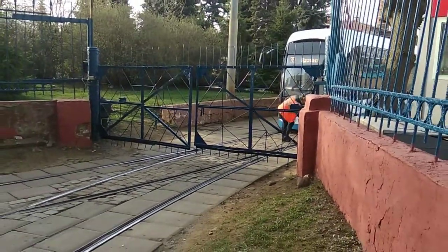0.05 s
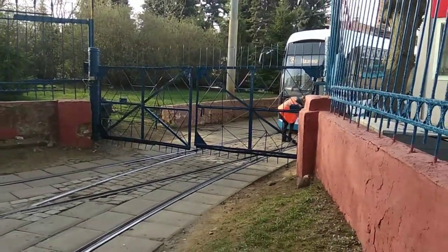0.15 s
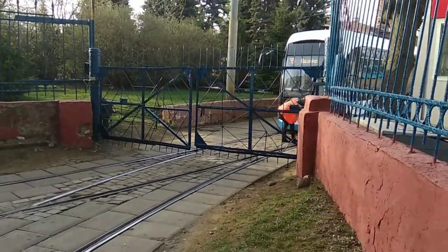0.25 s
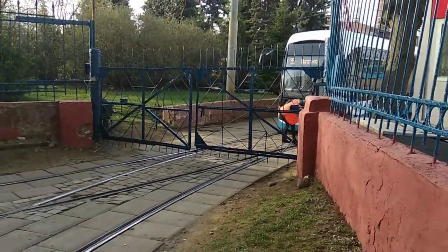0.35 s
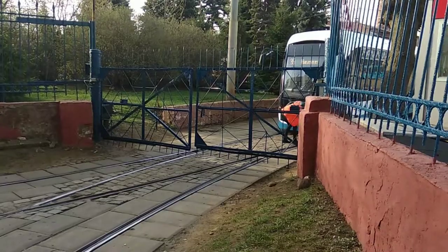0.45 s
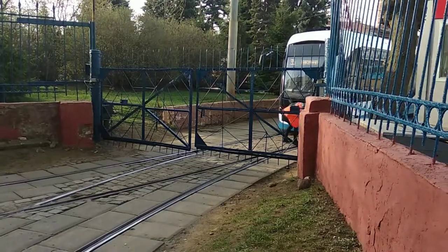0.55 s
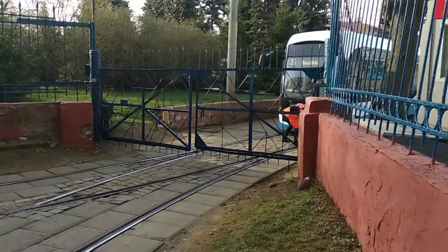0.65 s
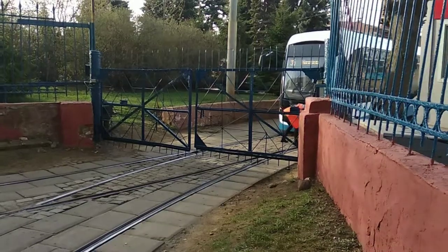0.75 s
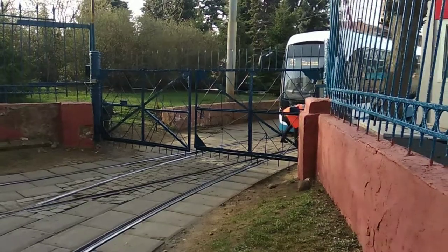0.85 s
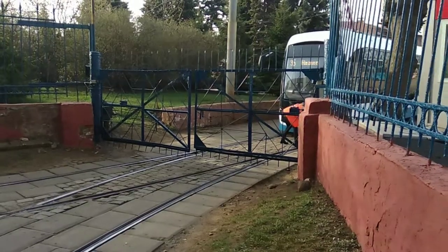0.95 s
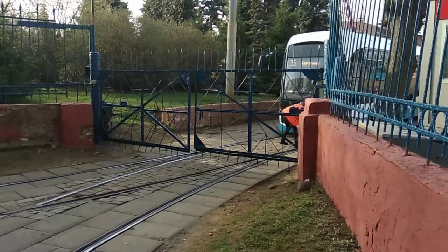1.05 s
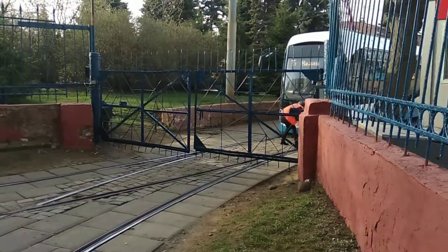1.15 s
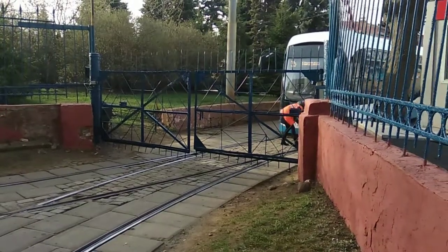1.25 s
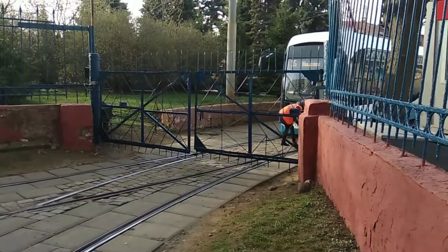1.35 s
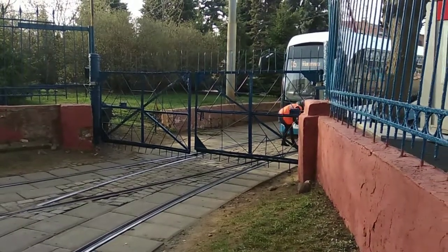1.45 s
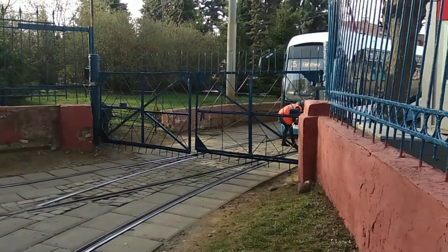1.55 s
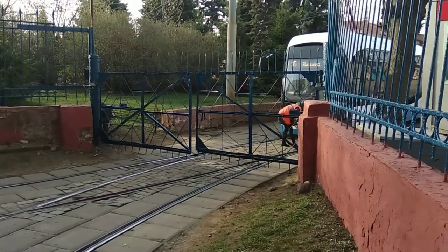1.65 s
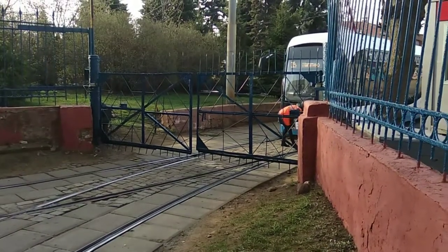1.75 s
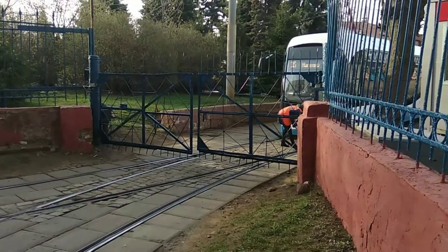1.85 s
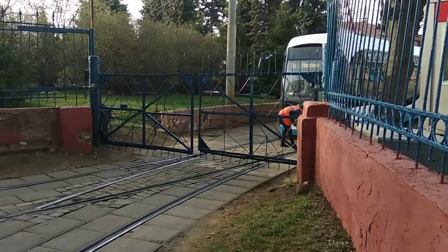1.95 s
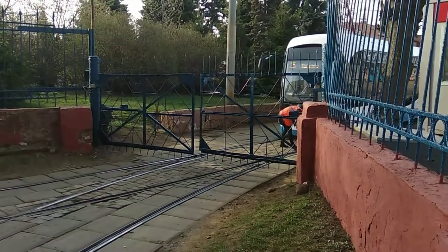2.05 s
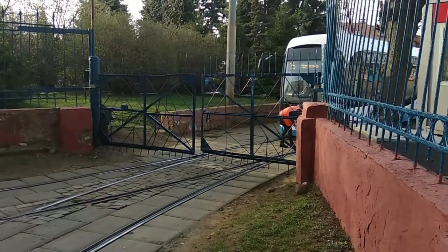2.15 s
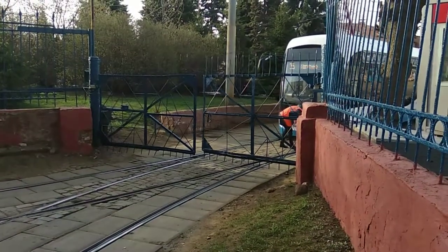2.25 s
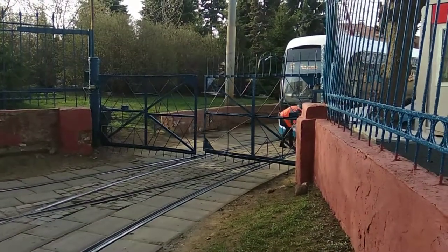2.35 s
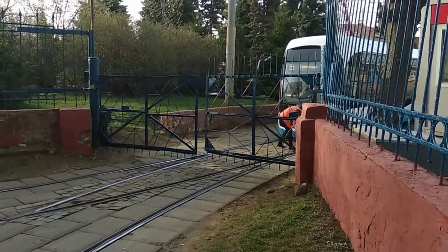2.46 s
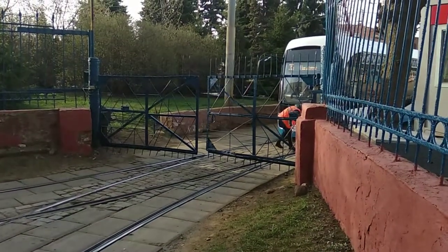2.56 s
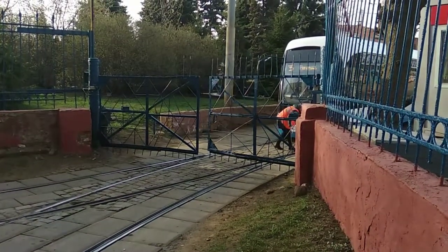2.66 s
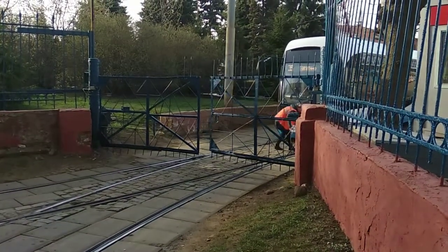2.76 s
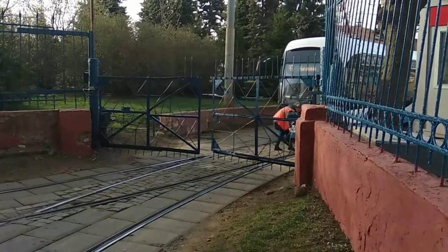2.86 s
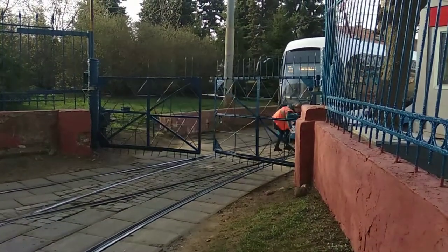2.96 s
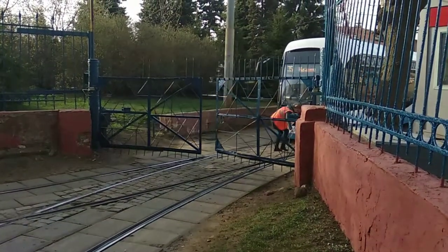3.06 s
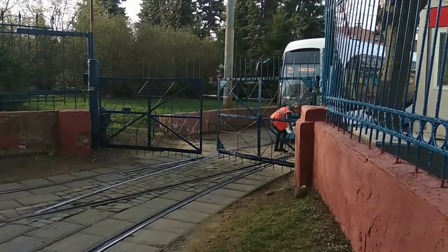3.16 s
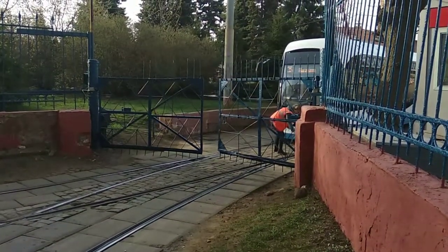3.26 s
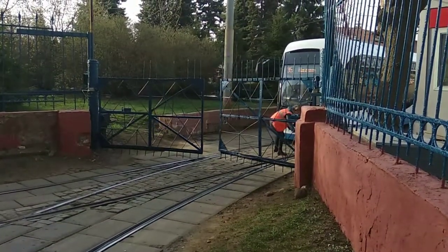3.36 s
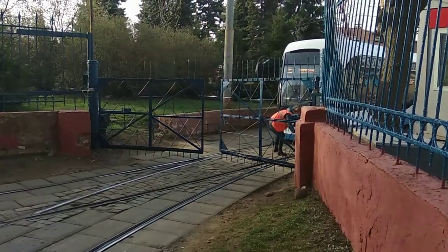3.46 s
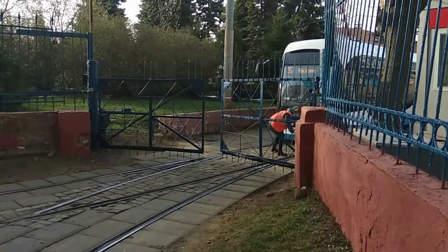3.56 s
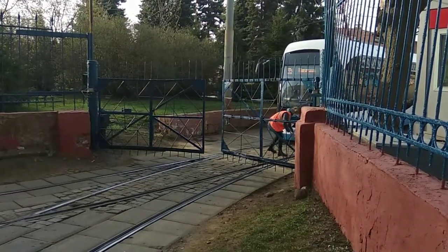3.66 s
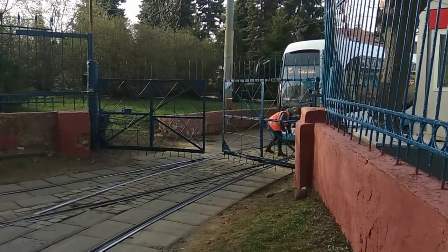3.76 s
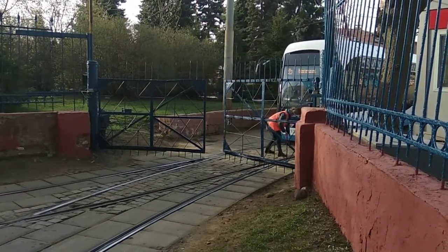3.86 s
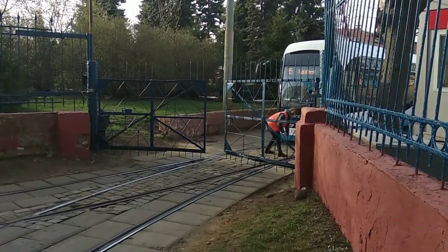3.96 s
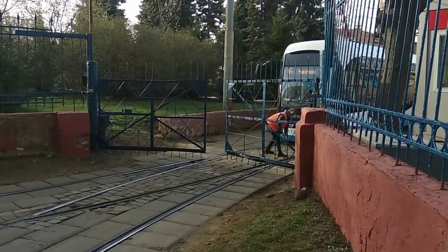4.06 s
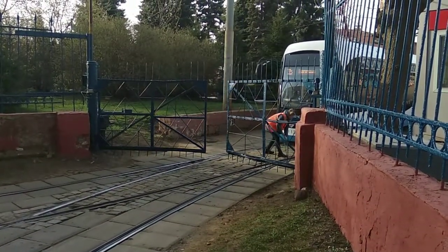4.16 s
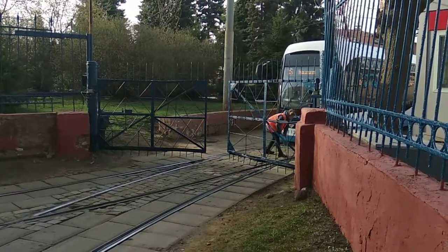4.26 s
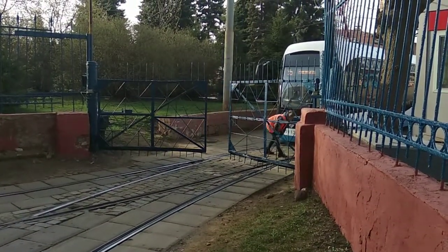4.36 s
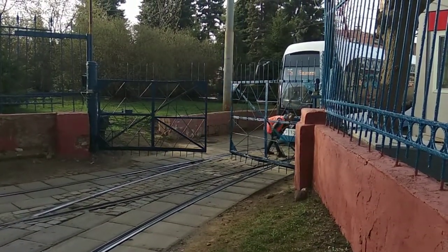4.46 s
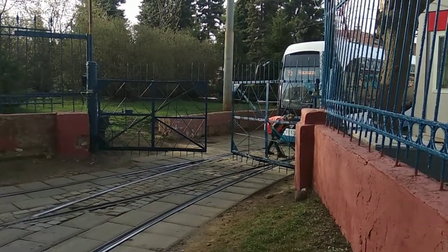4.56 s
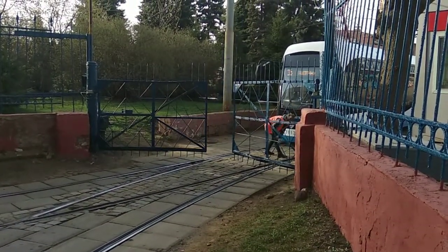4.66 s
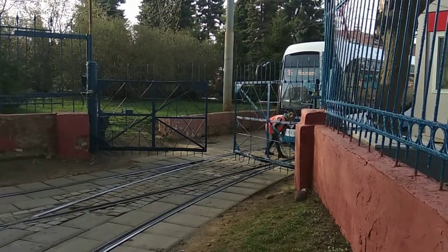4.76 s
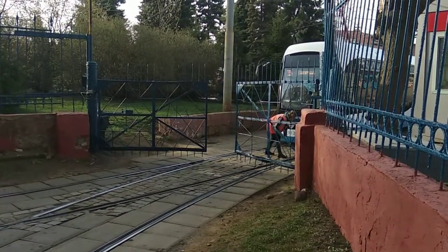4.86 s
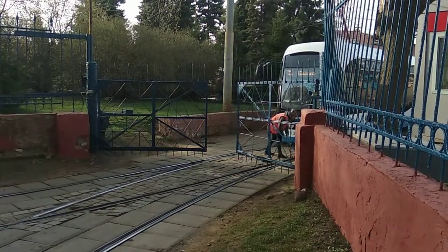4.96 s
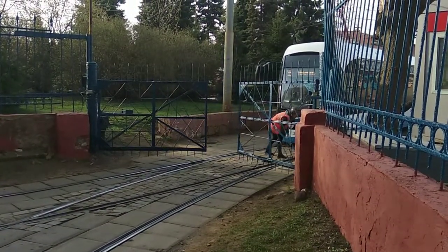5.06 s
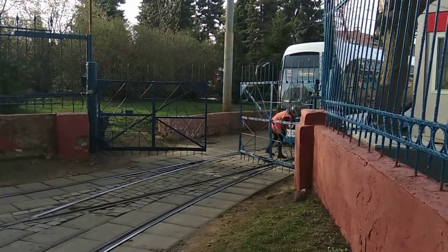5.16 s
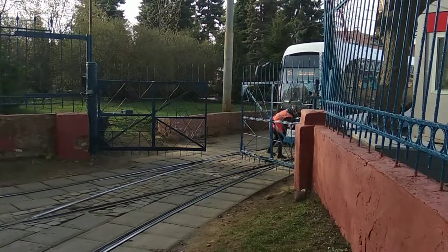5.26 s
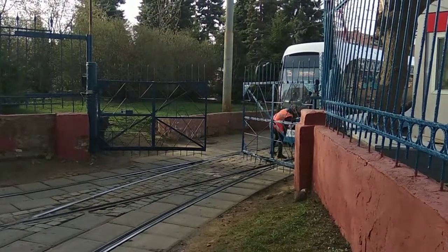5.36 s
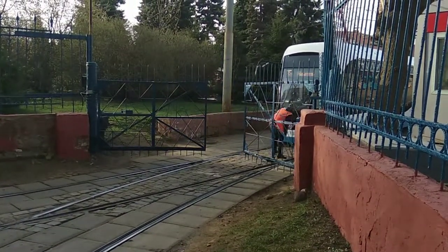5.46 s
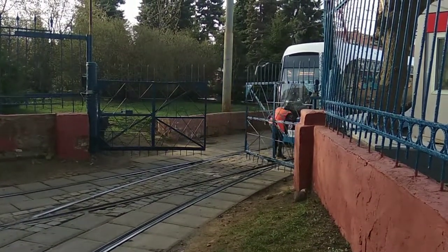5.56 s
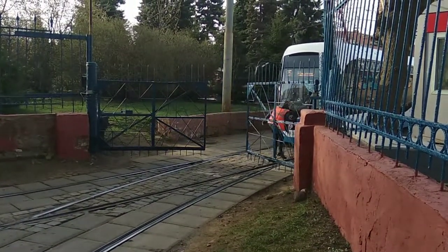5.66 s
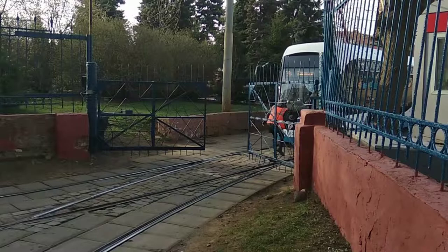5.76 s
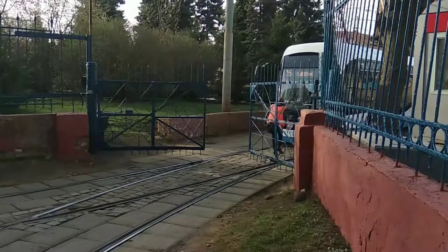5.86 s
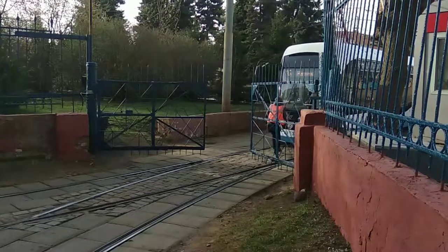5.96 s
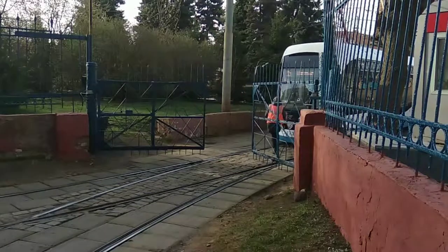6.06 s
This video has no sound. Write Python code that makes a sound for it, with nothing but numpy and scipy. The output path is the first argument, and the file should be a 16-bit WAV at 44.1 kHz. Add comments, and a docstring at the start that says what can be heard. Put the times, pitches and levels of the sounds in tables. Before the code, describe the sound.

Thin, trilled bird whistles sound over a low machine hum and distant rumble. After about a second, small ticks lead to a sharp snap with a low thump, setting off a surging, spitting hiss and a brief gurgle. The hiss continues as a heavy steel gate clanks, scrapes grittily, and clanks again more loudly near the end. Open yard, light echo, stereo microphone some metres away.

```python
"""Thin falling and held bird whistles, trilled sine tones with an octave, sound over a low hum and rumble
from the start; a faint rustle of bright noise swells and fades. From 1 s a worker unlatches a heavy steel
depot gate beside the rails: sharp snaps, short noise bursts and rings over a low thump, set off a surging,
spitting hiss of filtered noise and a brief wandering gurgle. The hiss runs on while the gate swings open; near
1.9 s and 4.6 s its frame, a bank of struck resonators, clanks after lighter knocks, amid gritty scrapes of
resonant noise. Echoes are decaying noise."""
import sys
import numpy as np
from scipy import signal
from scipy.fft import rfft, irfft, next_fast_len
from scipy.io import wavfile

SR = 44100
rng = np.random.default_rng(int(sys.argv[2]) if len(sys.argv) > 2 else 0)


def store_pcm(level_fs):
    """Save levels as 16-bit WAV."""
    pcm = np.round(np.clip(level_fs, -1, 1) * 32767).astype(np.int16)
    wavfile.write(sys.argv[1], SR, np.atleast_2d(pcm).T)


N = 269879
TIME = np.arange(N) / SR
FFT_SIZE = next_fast_len(N, True)
BINS = np.maximum(np.fft.rfftfreq(FFT_SIZE, 1 / SR), 1)

# Spectra of the distant rumble and of the hiss: (f/Hz, relative density/dB per Hz)
RUMBLE_SPECTRUM = [(25, -33), (50, -22.5), (90, -16), (135, -2.5), (180, 0), (290, -7), (450, -12),
                   (620, -13), (980, -11), (1400, -20), (2150, -21), (2800, -30.5), (6000, -34),
                   (10500, -33), (15500, -49)]
HISS_SPECTRUM = [(150, -20.5), (280, 8.5), (480, 2.5), (700, -5.5), (1400, -4), (1850, 0.5), (2500, -5.5),
                 (3400, -2.5), (4500, -9), (5900, -9.5), (8000, -6), (9500, -5), (12000, -12),
                 (15500, -19.5)]
# Bright noise shared by snaps, rattling fittings, spray and rustle: (f/Hz, relative density/dB per Hz)
BRIGHT_SPECTRUM = [(1500, -16), (3500, -2), (5500, -10.5), (7300, 3.5), (9000, 6), (12000, 3.5),
                   (14000, -2.5), (16000, -7)]
# Partials of the machine hum: (f/Hz, level/dB)
HUM_PARTIALS = [(148, -61), (185, -55), (297, -62), (445, -76.5)]
# Likeness of diffuse noise in the two ears: (f/Hz, left-right correlation)
LIKENESS = [(170, 0.94), (350, 0.83), (700, 0.55), (1400, 0), (2800, 0), (16000, 0)]
# Response of the right port: (f/Hz, level over the left/dB)
RIGHT_PORT = [(100, 1), (350, 0.5), (1000, 1.5), (4000, 2), (6500, 1.5), (9400, 2.5), (10400, -2),
              (11800, -9), (16000, -7.5)]

# Falling whistles: (t/s, length/s, start f/Hz, end f/Hz, relative level/dB, fade over the note/dB,
# relative echo level/dB)
GLIDES = [(0.059, 0.29, 9050, 6880, -39.5, 6, -5), (0.1, .04, 5250, 4120, -57, -5, -3),
          (0.205, 0.048, 4830, 3710, -60, -3, 1), (0.546, 0.038, 4630, 4070, -56.5, -7, 2),
          (0.587, 0.041, 4730, 3290, -54, 4, 2), (1.92, 0.24, 9200, 6420, -29, 8, -7),
          (2.494, 0.044, 4300, 4100, -46, -2, 4), (2.54, 0.029, 3900, 3670, -42.5, 0, -7),
          (3.734, 0.21, 8530, 6880, -53, 6.5, 12.5), (4.327, 0.33, 8590, 6200, -45.5, 2.5, 2.5)]
# Held whistles that swell to a crest: (crest t/s, hold/s, fall/s, crest f/Hz, relative crest level/dB,
# swell/dB, relative echo level/dB)
ARCHES = [(0.812, 0.115, 0.23, 6440, -33.5, 16, -4.5), (1.491, 0.105, 0.1, 6450, -32, 11, -6.5),
          (2.769, 0.128, 0.032, 6326, -34, 5.5, -3), (2.902, 0.075, 0.049, 6480, -42.5, 2, -14)]
# Strength of a whistle's octave: (fundamental f/Hz, level over the fundamental/dB)
OVERTONE = [(4200, -10), (4800, 5), (5400, 11), (5900, -6), (6300, -14.5), (7000, -27), (8000, -37)]

# Path of the hollow ring in the starting hiss: (t/s, centre f/Hz, relative level/dB)
GURGLE_PATH = [(1.209, 1034, -33.5), (1.24, 929, -31.5), (1.268, 831, -37), (1.29, 1196, -35),
               (1.309, 1356, -32), (1.345, 1380, -51)]
# Spits in the hiss, and short gritty scrapes around the gate's blows:
# (t/s, level/dB, time from peak to half amplitude/s)
SPITS_AND_SCRAPES = [(1.235, -42, 0.013), (1.301, -34, 0.019), (1.344, -38, 0.015), (1.859, -44, .006),
                     (1.875, -41, 0.0063), (1.976, -45, .006), (2.51, -47, 0.011), (2.576, -39, 0.021),
                     (2.794, -49, 0.022), (2.941, -40.5, 0.018), (2.995, -44, 0.023), (3.118, -38.5, 0.018),
                     (3.241, -47, 0.014), (3.592, -41, 0.012), (4.452, -43, 0.0042), (4.624, -40, 0.02),
                     (4.69, -45, 0.0072), (4.979, -42, .011), (5.16, -44.5, .01), (5.404, -38, 0.019),
                     (5.52, -40, 0.013), (5.637, -46, 0.0067), (5.942, -41.5, 0.014)]
# Resonances of the hiss, and those of the spits and scrapes: (f/Hz, width/Hz, relative level/dB)
HISS_RINGS = [(676, 79, 3.5), (1152, 207, 6), (1428, 160, 2.5), (2163, 270, -1.5), (2794, 38, -4),
              (3125, 290, -4.5), (3920, 160, -4.5), (5160, 200, -8)]
SPIT_AND_SCRAPE_RINGS = [(1377, 80, 5.5), (2260, 170, -1.5), (3080, 670, 5), (3930, 1700, 5),
                         (5230, 360, 0.5), (6940, 22, -7.5), (9390, 380, 5)]

# Sharp snaps and ticks: (t/s, crack level/dB, clack level/dB, body level/dB, rise/s, T60/s)
SNAPS = [(1.011, -41, -50, -45, 0.0006, 0.1), (1.062, -48.5, -63, -70, .002, 0.077),
         (1.160, -45, -69, -60, 0.0054, 0.07), (1.189, -26, -53, -28, 0.0019, 0.058),
         (1.196, -18.5, -52, -26, 0.002, 0.036), (1.200, -45, -46, -30, 0.0013, 0.21),
         (1.215, -29.5, -37, -43, 0.0029, 0.086), (1.267, -35, -44, -47, .001, .12),
         (1.704, -44, -62, -71, .005, 0.12), (2.452, -38, -31, -61, 0.0028, 0.05)]
# Broad clack and hollow body of a snap: (f/Hz, width/Hz, relative level/dB)
CLACK_MODES = [(4240, 3400, -0.5), (4800, 1300, 2.5), (5960, 2300, -3.5)]
SNAP_BODY_MODES = [(170, 100, -3), (270, 50, 4), (475, 36, -2), (583, 39, 5.5), (735, 51, 6.5),
                   (1100, 170, -0.5), (1840, 200, -2), (2350, 150, -3.5), (2710, 120, -10),
                   (3850, 220, -13)]

# Blows on the gate; the first row is the low thump under the sharp snap: (t/s, thud level/dB,
# clang level/dB, crunch level/dB, latch level/dB, rattle level/dB, rise/s, T60/s)
THUMP_AND_BLOWS = [(1.185, -34.5, -52, -60, -54, -55, 0.0023, 0.2),
                   (1.815, -33, -39.5, -56, -38.5, -59, 0.00087, .3),
                   (1.885, -32, -22.5, -44, -35, -50, .0008, 0.047),
                   (1.889, -17.5, -37, -48, -30, -37, 0.002, 0.063),
                   (1.899, -22, -23.5, -32, -49, -38, 0.0014, 0.055),
                   (1.911, -30, -32.5, -42, -40, -48, 0.0014, .26),
                   (4.465, -25, -35, -52, -29, -52, .0006, .08),
                   (4.473, -42, -37, -43, -37, -54, 0.0018, .16),
                   (4.584, -23, -35, -50, -47, -53, 0.0014, 0.079),
                   (4.595, -29, -33.5, -41, -35, -49, 0.0029, 0.17),
                   (4.635, -18, -24, -29, -39, -37, .0018, 0.056),
                   (4.644, -25.5, -17, -26.5, -26, -41, .0012, 0.058),
                   (4.652, -36, -23, -27, -37, -35, .0008, .04),
                   (4.664, -30, -28.5, -38.5, -34, -44, 0.0015, 0.24)]
# Dull boom, main modes and bright upper modes of the frame: (f/Hz, width/Hz, relative level/dB)
BOOM_MODES = [(70, 59, -25), (135, 29.5, -4.5), (173.5, 46, -1.5), (239.5, 27, -2.5), (290, 126, -4)]
FRAME_MODES = [(365, 55, -5.5), (447, 18, -2.5), (517, 36, -6), (607, 32, -3.5), (703, 64, -4),
               (803, 79, -1), (958, 40, -3), (1036, 190, 0.5), (1264, 98, 2.5), (1444, 70, -4.5),
               (1620, 140, -7.5)]
FRAME_TOP_MODES = [(1870, 600, 1.5), (2240, 300, 3.5), (3100, 400, -4.5), (3500, 490, -4.5),
                   (4160, 140, -7)]
# Ring of the latch bar: (f/Hz, width/Hz, relative level/dB)
LATCH_MODES = [(645, 55, -2), (870, 59, -4.5), (922, 12, 2), (1210, 120, -5)]

RUMBLE_DB = -45
RUSTLE_S, RUSTLE_RISE_S, RUSTLE_T60_S = 0.051, 0.083, 0.7
RUSTLE_DB, RUSTLE_FLOOR_DB = -52, -80   # passing swell; faint part that stays
WHISTLE_ATTACK_S, WHISTLE_RELEASE_S = 0.0063, 0.017
GLIDE_TRILL_HZ, GLIDE_TRILL_SHARE = 232, 0.024   # rate; depth as a share of the pitch
ARCH_DIP_HZ, ARCH_FALL_HZ_PER_S = 238, 13000   # sag within the hold; slide after the crest
ARCH_DROP_DB, ARCH_DROP_S, ARCH_FADE_DB_PER_S = 14, 0.03, 81   # quick loss, then slow fade
ARCH_TRILL_HZ, ARCH_TRILL_DEPTH_HZ, ARCH_TRILL_GROWTH_S = 108.7, 275, 0.04
YARD_ECHO_T60_S = 0.88
GURGLE_ATTACK_S, GURGLE_RELEASE_S = 0.012, 0.026
OPEN_S, OPEN_RISE_S, HISS_DB, HISS_SAG_DB_PER_S = 1.19, 0.023, -43, 0.22
SURGE_S, SURGE_RISE_S, SURGE_T60_S, SURGE_DB, SPRAY_DB = 1.294, 0.023, 0.48, -39, -30
CUTOFF_HZ = 15800


def from_db(db):
    """Level: decibels become an amplitude ratio."""
    return 10 ** (np.asarray(db) / 20)


def rms_one(x):
    """Normalization: the signal is scaled to unit mean power."""
    return x / np.sqrt(np.mean(x ** 2) + 1e-20)


def ramp(x):
    """Linear envelope: a straight rise from 0 to 1, held at both ends."""
    return np.clip(x, 0, 1)


def by_hz(points):
    """Interpolation: straight lines in log frequency join the points of a spectrum."""
    hz, value = np.transpose(points)
    return np.interp(np.log(BINS), np.log(hz), value)


def drift(rate):
    """Random modulation: straight lines join normal deviates at the given rate in Hz, spread about 1."""
    knots = rng.standard_normal(4000)
    return np.interp(TIME * rate, np.arange(len(knots)), knots) / np.sqrt(2 / 3)


def grit(depth_db, rate):
    """Amplitude modulation: a fine uneven grain of unit power, its peaks capped."""
    return rms_one(from_db(depth_db * np.minimum(drift(rate), 2)))


def air():
    """Diffuse-field coherence: white stereo noise alike in the bass and unrelated in the treble."""
    mid, side = rfft(rng.standard_normal((2, FFT_SIZE)))
    alike = by_hz(LIKENESS)
    stereo = np.sqrt(1 + alike) * mid + np.sqrt(1 - alike) * side * [[1], [-1]]
    return irfft(stereo, FFT_SIZE)[:, :N]


def coloured(spectrum):
    """Spectral shaping: stereo noise is filtered to a smooth spectrum, rms 1."""
    shaped = rfft(air(), FFT_SIZE) * from_db(by_hz(spectrum))
    return rms_one(irfft(shaped, FFT_SIZE)[:, :N])


def resonate(force, modes):
    """Modal superposition: parallel damped modes share the power of a white force by their levels."""
    out, total = 0, 0
    for k, (hz, width, db) in enumerate(modes):
        radius = np.exp(-np.pi * width / SR)
        sign = (-1) ** k   # neighbouring modes alternate in phase
        gain = sign * from_db(db) * np.sqrt((1 - radius * radius) / 2)
        poles = [1, -2 * radius * np.cos(2 * np.pi * hz / SR), radius * radius]
        out = out + signal.lfilter([gain, 0, -gain], poles, force)
        total += from_db(db) ** 2
    return out / np.sqrt(total)


def blow(s, rise, t60):
    """Contact mechanics: force swells as parts meet, then decays exponentially as they chatter to rest."""
    swell = np.exp(-0.5 * np.clip((s - TIME) / rise, 0, 10) ** 2)
    return swell * from_db(-60 * np.clip((TIME - s) / t60, 0, 2))


def sum_blows(times, levels_db, rises, t60s):
    """Linear superposition: the contact forces of all blows add."""
    return sum(from_db(db) * blow(s, rise, t60) for s, db, rise, t60 in zip(times, levels_db, rises, t60s))


def struck(times, levels_db, rises, t60s, modes, clean, direct):
    """Forced vibration: a clean impulse and gritty chatter drive the modes, clean being an energy share.

    The direct share of the chatter is alike in both ears; the rest is diffuse."""
    impact = np.zeros(N)
    for s, db, t60 in zip(times, levels_db, t60s):
        decay_energy = SR * t60 / np.log(1e6)   # energy of the matching exponential decay
        impact[round(s * SR)] += from_db(db) * np.sqrt(decay_energy)
    chatter = sum_blows(times, levels_db, rises, t60s) * grit(depth_db=2.5, rate=500)
    noise = np.sqrt(direct) * rng.standard_normal(N) + np.sqrt(1 - direct) * air()
    return resonate(np.sqrt(clean) * impact + np.sqrt(1 - clean) * chatter * noise, modes)


def echo(x, t60, delay=0.0087):
    """Diffuse reverberation: convolution with decaying noise, independent in each ear."""
    t = TIME[:SR]
    tail = rng.standard_normal((2, SR)) * from_db(-60 * t / t60) * (t > delay)
    tail /= np.sqrt(np.sum(tail ** 2, axis=1, keepdims=True))
    return signal.fftconvolve(np.atleast_2d(x), tail, axes=1)[:, :N]


def machine_hum(waver_hz=5.95, throb_db=2.5):
    """Frequency and amplitude modulation: low sine partials waver and throb independently."""
    hum = 0
    for hz, db in HUM_PARTIALS:
        phase = 2 * np.pi * np.cumsum(hz + waver_hz * drift(30)) / SR
        hum = hum + from_db(db + throb_db * drift(7.7)) * np.sqrt(2) * np.sin(phase)
    return hum


def yard():
    """Superposition: distant rumble noise, the hum and a high rustle that swells, then stays faintly."""
    rumble = from_db(RUMBLE_DB) * coloured(RUMBLE_SPECTRUM)
    swell = from_db(RUSTLE_DB) * blow(RUSTLE_S, RUSTLE_RISE_S, RUSTLE_T60_S)
    rustle = (swell + from_db(RUSTLE_FLOOR_DB)) * coloured(BRIGHT_SPECTRUM)
    return rumble + machine_hum() + rustle


def trill(t, rate_hz, unsteady=0.044):
    """Frequency modulation: a nearly regular swing between -1 and 1 at the given times."""
    rate = rate_hz * (1 + unsteady * np.interp(t, TIME, drift(60)))
    return np.sin(2 * np.pi * np.cumsum(rate) / SR)


def glide(s, length, start_hz, end_hz, db, fade_db):
    """Linear glissando: times, pitch and level of a buzzing whistle that slides evenly down."""
    t = TIME[(TIME >= s) & (TIME < s + length)]
    along = (t - s) / length
    slide_hz = start_hz + (end_hz - start_hz) * along
    hz = slide_hz * (1 + GLIDE_TRILL_SHARE * trill(t, GLIDE_TRILL_HZ))
    return t, hz, db - fade_db * along


def arch(s, hold, fall, crest_hz, db, swell_db):
    """Growing modulation: times, pitch and level of a whistle whose trill deepens toward its crest."""
    t = TIME[(TIME >= s - hold) & (TIME < s + fall)]
    before = ramp((s - t) / hold)   # 1 at the start, 0 from the crest on
    after = np.maximum(t - s, 0)
    hz = crest_hz - ARCH_DIP_HZ * np.sin(np.pi * before) ** 2 - ARCH_FALL_HZ_PER_S * after
    trill_depth_hz = ARCH_TRILL_DEPTH_HZ * np.exp(-before * hold / ARCH_TRILL_GROWTH_S)
    hz = hz + trill_depth_hz * trill(t, ARCH_TRILL_HZ)
    loss_db = ARCH_DROP_DB * (1 - np.exp(-after / ARCH_DROP_S)) + ARCH_FADE_DB_PER_S * after
    return t, hz, db - swell_db * before - loss_db


def birds(tremble_db=-0.1, quaver_hz=50, scatter_db=-3.5, direct_db=-3.5):
    """Direct and reverberant fields: trilled whistles, blurred by branches; far ones are mostly echo."""
    direct, sent = np.zeros((2, N))
    quaver = drift(640)
    tremble = from_db(tremble_db * drift(120))
    notes = [(glide(*row), echo_db) for *row, echo_db in GLIDES]
    notes += [(arch(*row), echo_db) for *row, echo_db in ARCHES]
    for (t, hz, db), echo_db in notes:
        on = np.round(t * SR).astype(int)
        phase = 2 * np.pi * np.cumsum(hz + quaver_hz * quaver[on]) / SR
        octave = from_db(np.interp(hz, *np.transpose(OVERTONE))) * np.sin(2 * phase)
        tone = np.sin(phase) + octave
        edges = ramp((t - t[0]) / WHISTLE_ATTACK_S) * ramp((t[-1] - t) / WHISTLE_RELEASE_S)
        call = from_db(db) * tone * tremble[on] * edges
        direct[on] += call
        sent[on] += from_db(echo_db) * call
    scattered = echo(direct, t60=0.031, delay=0.0015)
    near = from_db(direct_db) * direct + from_db(scatter_db) * scattered
    leaning_right = near * from_db([[-1.0], [1.0]])
    return leaning_right + echo(sent, YARD_ECHO_T60_S)


def gurgle(width_hz=260.0, level_db=-3.5):
    """Heterodyning: narrow noise moved to a centre that sags, then climbs with the surge and dies."""
    s, hz, db = np.transpose(GURGLE_PATH)
    attack = ramp(1 + (TIME - s[0]) / GURGLE_ATTACK_S)
    release = ramp(1 - (TIME - s[-1]) / GURGLE_RELEASE_S)
    low_pass = signal.butter(2, width_hz / 2, fs=SR, output="sos")
    band = signal.sosfilt(low_pass, air() + 1j * air())
    carrier = np.exp(2j * np.pi * np.cumsum(np.interp(TIME, s, hz)) / SR)
    ring = rms_one((band * carrier).real)
    return ring * attack * release * from_db(level_db + np.interp(TIME, s, db))


def hiss_and_scrapes(flutter_db=1.45, ring_db=-4.0, sputter_db=-10.5, uneven_db=-4.5):
    """Flow and friction noise: a resonant hiss surges, loses pressure and spits; gritty scrapes join it."""
    age = TIME - OPEN_S
    surge = blow(SURGE_S, SURGE_RISE_S, SURGE_T60_S)
    pressure = from_db(HISS_DB - HISS_SAG_DB_PER_S * age) + from_db(SURGE_DB) * surge
    flow = ramp(age / OPEN_RISE_S) * pressure
    hollow = coloured(HISS_SPECTRUM) + from_db(ring_db) * resonate(air(), HISS_RINGS)
    steady = flow * from_db(flutter_db * drift(45)) * hollow
    bursts = sum(from_db(db) / (1 + ((TIME - s) / length) ** 4) for s, db, length in SPITS_AND_SCRAPES)
    # weaker spits between the listed bursts
    sputter = flow * from_db(sputter_db + uneven_db * np.minimum(drift(22), 1))
    grain = grit(depth_db=1.5, rate=230)
    spray = grain * from_db(SPRAY_DB) * surge * coloured(BRIGHT_SPECTRUM)
    spits_and_scrapes = resonate(grain * np.hypot(bursts, sputter) * air(), SPIT_AND_SCRAPE_RINGS)
    return steady + spray + spits_and_scrapes


def snaps():
    """Impact radiation: hard small contacts give a bright crack, a clack and a short hollow ring."""
    s, crack, clack, body, rise, t60 = np.transpose(SNAPS)
    cracking = sum_blows(s, crack, rise, t60) * coloured(BRIGHT_SPECTRUM)
    clacking = struck(s, clack, rise, t60, CLACK_MODES, clean=0.05, direct=0.05)
    ringing = struck(s, body, rise, t60, SNAP_BODY_MODES, clean=0.44, direct=0.7)
    return cracking + clacking + ringing


def thump_and_gate(lean_db=1.0):
    """Modal excitation: the snap's low thump, then the gate's blows, drive boom, clang, crunch and rattle."""
    s, thud, clang, crunch, latch, rattle, rise, t60 = np.transpose(THUMP_AND_BLOWS)
    boom = struck(s, thud, rise, t60, BOOM_MODES, clean=0.78, direct=0.93)
    low = struck(s, clang, rise, t60, FRAME_MODES, clean=0.33, direct=0.86)
    high = struck(s, crunch, rise, t60, FRAME_TOP_MODES, clean=0.24, direct=0.29)
    bar = struck(s, latch, rise, t60, LATCH_MODES, clean=0.47, direct=0.65)
    leaning_right = (low + high + bar) * from_db(lean_db * np.array([[-0.5], [0.5]]))
    rattling = sum_blows(s, rattle, rise, t60) * coloured(BRIGHT_SPECTRUM)
    return boom + leaning_right + rattling


def scene():
    """Superposition: gate, snaps and gurgle with a little echo, over hiss, scrapes, birds and yard."""
    hits = thump_and_gate() + snaps() + gurgle()
    reverberant = from_db(-16.0) * echo(hits, t60=1.0)
    return yard() + birds() + hiss_and_scrapes() + reverberant + hits


def record(dry):
    """Linear filtering: the right port is a little louder but dull on top; the treble is cut steeply."""
    tilt = from_db(by_hz(RIGHT_PORT) * np.array([[-0.5], [0.5]]))
    low_pass = 1 / np.sqrt(1 + (BINS / CUTOFF_HZ) ** 240)
    return irfft(rfft(dry, FFT_SIZE) * tilt * low_pass, FFT_SIZE)[:, :N]


dry = scene()
out = record(dry)
store_pcm(out)
```